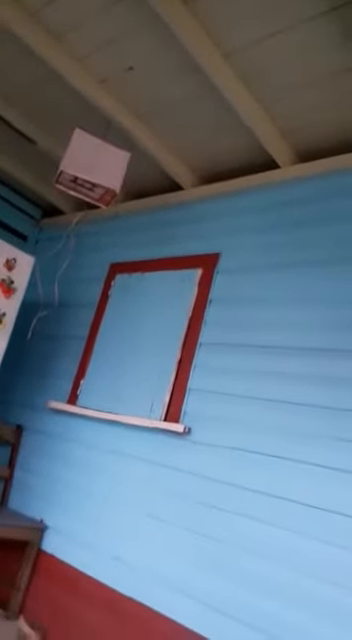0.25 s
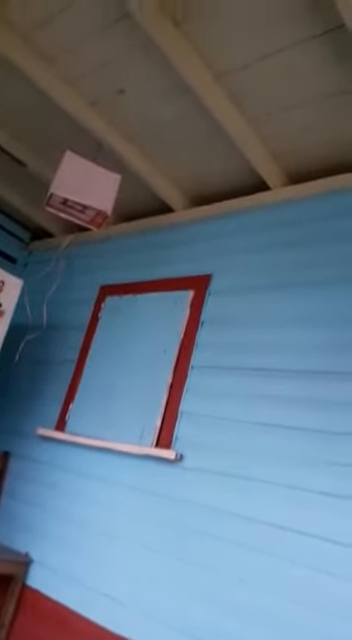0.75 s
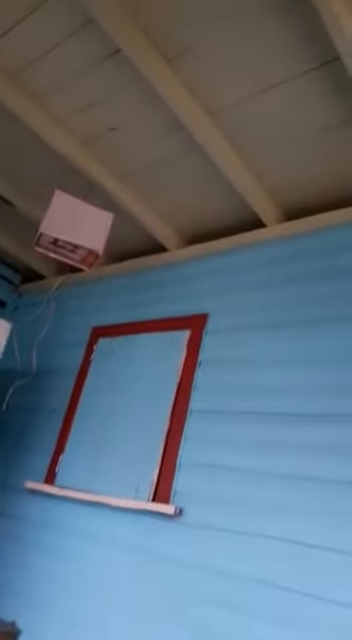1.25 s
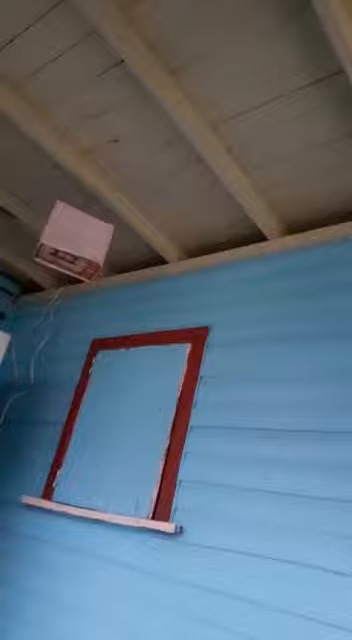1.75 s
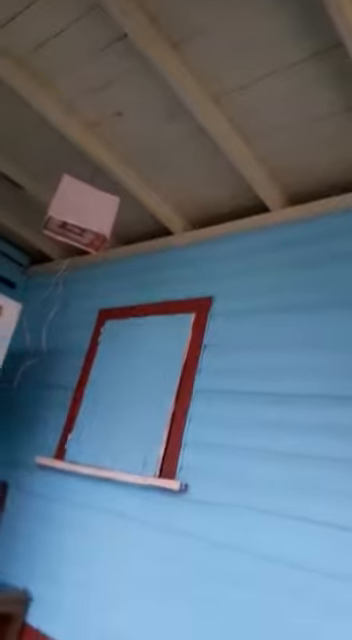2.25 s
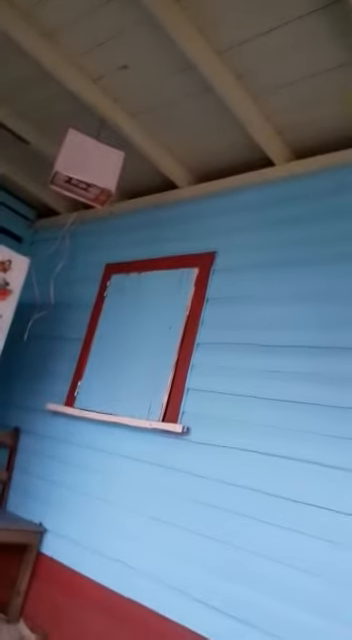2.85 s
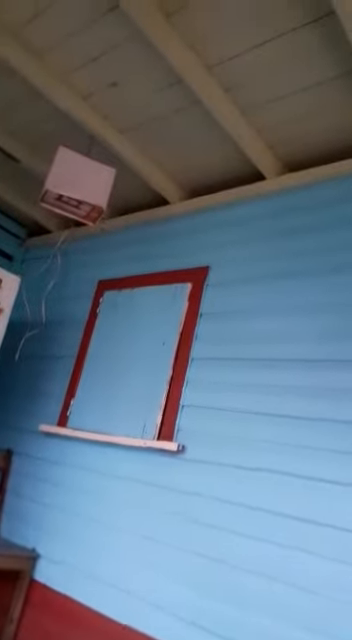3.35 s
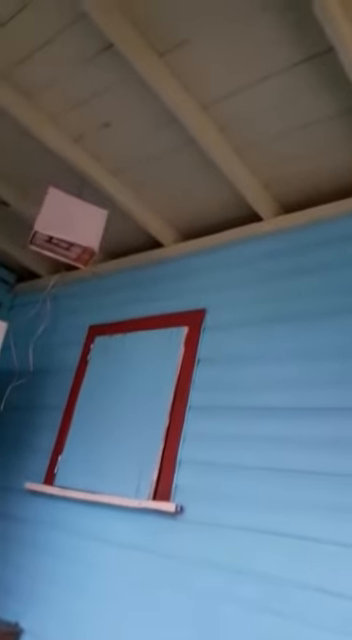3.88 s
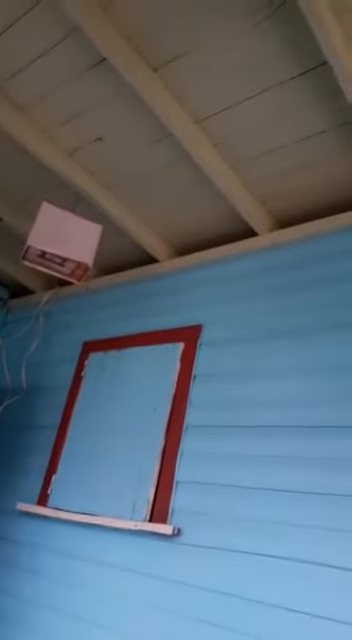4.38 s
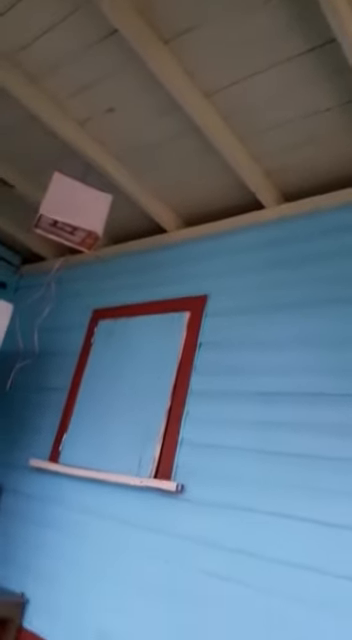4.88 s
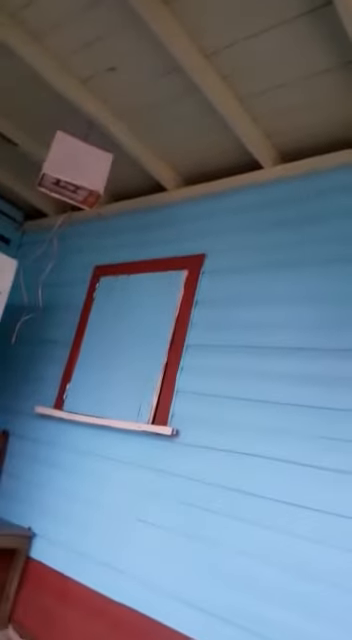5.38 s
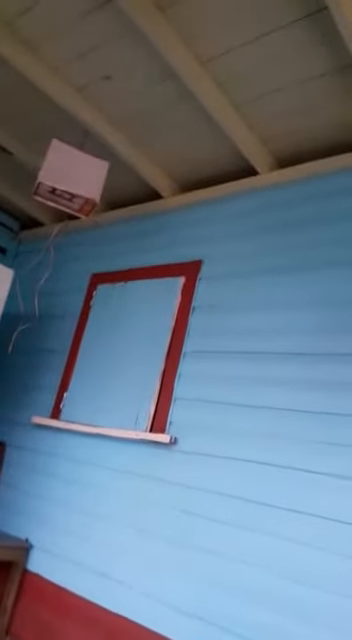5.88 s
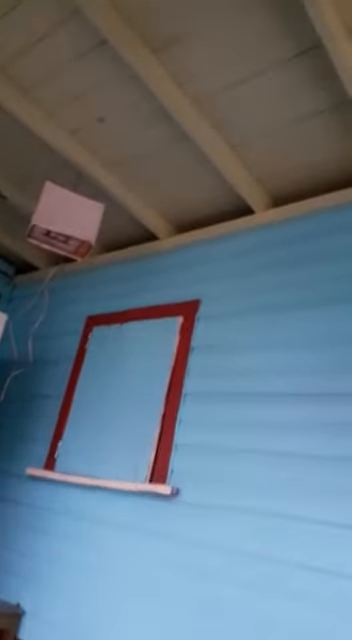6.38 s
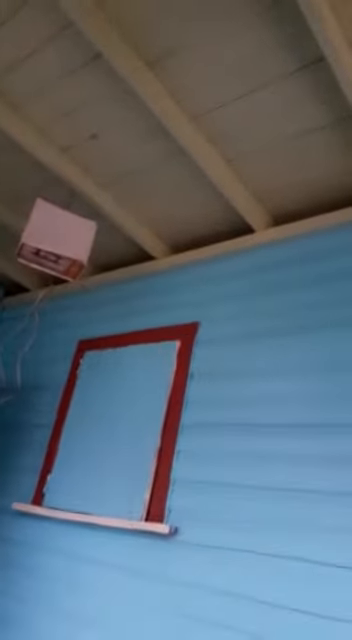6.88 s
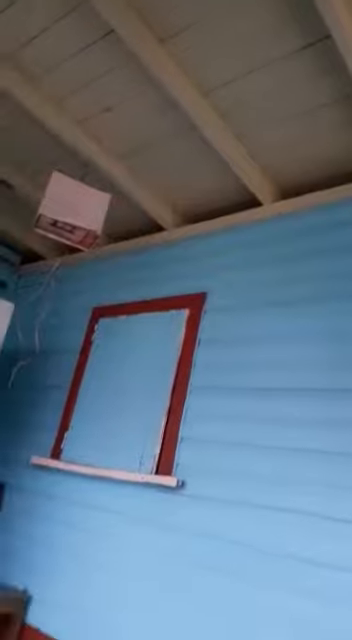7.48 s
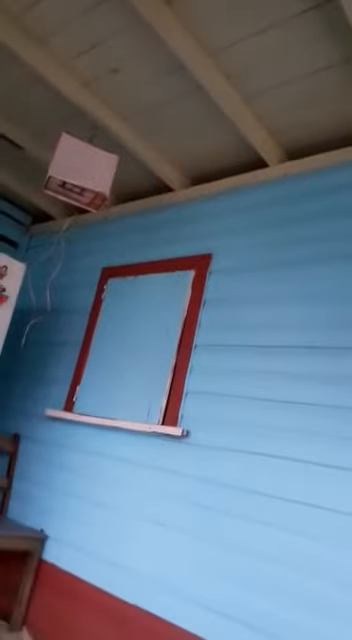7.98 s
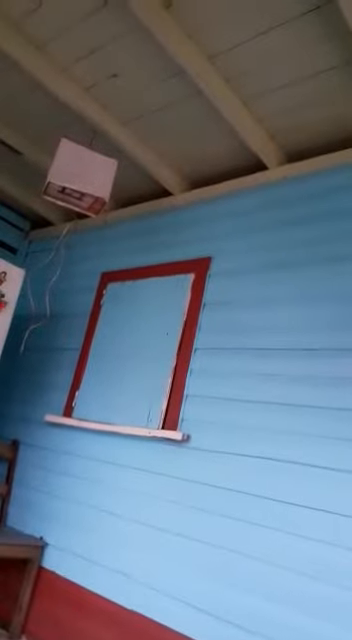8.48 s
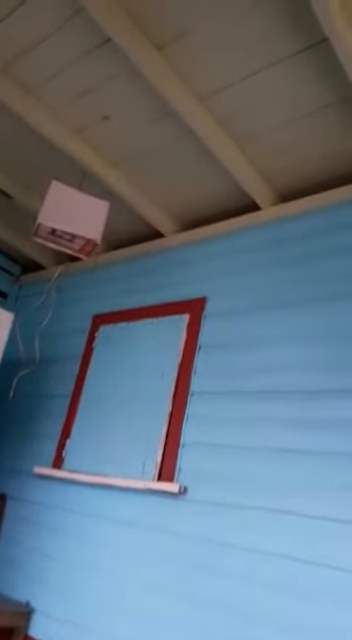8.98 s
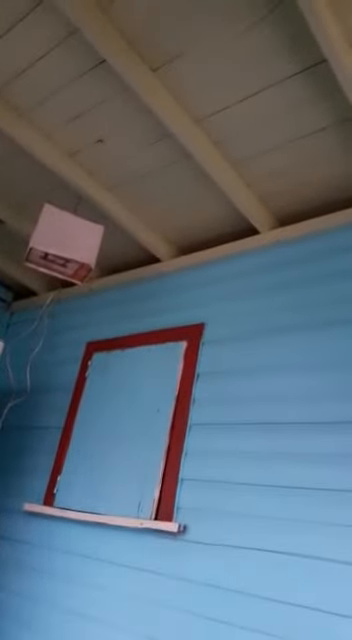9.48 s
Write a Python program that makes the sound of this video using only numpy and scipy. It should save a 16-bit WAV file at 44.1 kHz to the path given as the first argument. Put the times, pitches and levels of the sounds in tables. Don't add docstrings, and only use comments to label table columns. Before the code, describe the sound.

A songbird close by stays silent for seconds, then whistles rising slurs and a falling trill over faint hum, distant birds and soft wooden knocks.

```python
import sys
import numpy as np
from scipy import signal
from scipy.fft import rfft, irfft, next_fast_len
from scipy.io import wavfile
from scipy.ndimage import uniform_filter1d, minimum_filter1d

SR = 44100
rng = np.random.default_rng(int(sys.argv[2]) if len(sys.argv) > 2 else 0)


def digitize_waveform(pressure):
    field = np.atleast_2d(pressure).T
    bounded = np.clip(field, -1, 1)
    quanta = np.round(bounded * 32767).astype(np.int16)
    wavfile.write(sys.argv[1], SR, quanta)


def attenuation_scalar(level_db):
    decades = np.asarray(level_db, float) / 20
    return 10 ** decades


N = 429518
T = np.arange(N) / SR
SIZE = next_fast_len(N + SR)
BINS = np.arange(SIZE // 2 + 1) * SR / SIZE + 1e-3

# t/s, length/s, low f/Hz, top f/Hz, level/dB
SONG = [
    (6.777, 0.23, 3560, 4704, -54.5),
    (7.126, 0.26, 3456, 4543, -32.5),
    (7.527, 0.26, 3282, 4640, -22.5),
    (7.986, 0.24, 3010, 4515, -24),
    (8.357, 0.23, 2970, 3703, -28.5),
]
# share where attack ends, share where glide levels off, effort gained level/dB
MANNER = [(0.32, 0.61, -12.5), (0.34, .7, -8), (0.31, 0.77, 15), (0.37, .85, 2.5), (0.51, .74, -5)]
# t/s, f/Hz, level/dB
HOOK = [
    (8.665, 3730, -62),
    (8.725, 4317, -16.5),
    (8.789, 5130, -26),
    (8.815, 5290, -23),
    (8.831, 4430, -20),
    (8.86, 4518, -32),
]
# t/s, f/Hz, level/dB
SLUR = [
    (9.32, 3410, -46.5),
    (9.359, 3366, -39.5),
    (9.431, 2840, -38.5),
    (9.45, 2716, -42.5),
    (9.47, 2810, -66),
]
# t/s, starting f/Hz, knee f/Hz, level/dB
TRILL = [
    (9.005, 5750, 4260, -33.5),
    (9.079, 5540, 4270, -31),
    (9.159, 5420, 4060, -32),
    (9.245, 4720, 3940, -32.5),
]
OVERTONES_DB = [-33, -28, -40]
# f/Hz, level/dB
BEAK = [(6000, -7), (8500, -2), (10500, -14.5), (12000, -8), (13500, -3), (15500, 5)]
BRIGHT_DB = [-17, 5, 1.5, 0.5, 3, 0, 7]
# left echo t/ms, right echo t/ms, level/dB
BOARDS = [(2.5, 2.2, -3), (4.1, 5.1, -6), (11, 11.8, -7), (13.5, 14.6, -9)]

# t/s, length/s, first f/Hz, last f/Hz, level/dB
NEIGHBOUR = [
    (.3, 0.21, 6460, 5350, -54),
    (.92, .22, 6890, 5520, -53),
    (1.45, 0.36, 6965, 7305, -52),
    (2.07, .4, 7240, 8130, -56),
    (9.63, 0.14, 6770, 6420, -54),
]
# share of length, share of glide, level/dB
THIN = [(0, 0.27, -8.5), (0.301, 0.16, -0.5), (0.699, .88, -5.5), (.99, .99, -22.5)]
# t/s, f/Hz, level/dB
TUMBLE = [
    (4.69, 5160, -74),
    (4.72, 5010, -75),
    (4.75, 3650, -68.5),
    (4.79, 3500, -81),
]
# t/s, length/s, f/Hz, level/dB
PEEPS = [(.07, 0.119, 6090, -64), (.58, .05, 8560, -63.5), (.76, 0.25, 6810, -61.5), (1.17, .09, 9080, -68),
         (1.33, 0.18, 5840, -66), (1.85, 0.23, 9500, -66), (2.2, .07, 5790, -63), (7.78, 0.087, 6140, -59),
         (8.21, .17, 6080, -58), (8.42, .2, 5960, -61.5), (9.3, 0.06, 8750, -66.5), (9.48, 0.12, 6870, -64)]
# t/s, length/s, first f/Hz, level/dB
FAR_LOW = [(-.06, .12, 4295, -58.5), (.27, 0.18, 4240, -61), (.69, 0.18, 4276, -61.5),
           (1.1, 0.17, 4246, -62), (1.42, 0.18, 4260, -60.5), (1.83, 0.14, 4280, -59.5),
           (2.24, .19, 4175, -61.5), (2.81, .13, 5270, -66.5), (4.59, 0.076, 4100, -77),
           (5.06, 0.16, 4990, -68)]
# share of length, share of glide, level/dB
DROOP = [(0, 0.021, -3.5), (.34, .62, 0.5), (0.989, 1, -12.5)]
# t/s, length/s, first f/Hz, last f/Hz, level/dB
FAR_HIGH = [(-.03, .06, 5400, 4000, -62), (0, 0.05, 7900, 6820, -53), (.17, 0.048, 9740, 7040, -59.5),
            (.67, 0.05, 7900, 6250, -54.5), (1.6, 0.16, 9600, 9000, -67), (1.28, .15, 5150, 4920, -63.5),
            (1.7, 0.22, 5600, 4860, -66), (1.93, 0.061, 6630, 5060, -62), (2.15, 0.13, 5350, 4855, -65),
            (2.4, 0.064, 7820, 6065, -58), (7.1, 0.25, 7280, 6860, -63.5), (6.64, 0.13, 8500, 6180, -65.5),
            (7.42, .3, 10030, 6480, -55), (7.83, .29, 10280, 6330, -55), (8.22, 0.092, 8400, 6600, -52.5),
            (8.57, 0.21, 10220, 6900, -58), (9.03, 0.11, 6470, 5870, -47), (9.34, 0.12, 9900, 6350, -55)]
# share of length, share of glide, level/dB
SWOOP = [(0, 0.062, -16.5), (.6, .65, -2.5), (0.991, 1, 0.5)]

# wing f/Hz, width/Hz, strokes per s, level/dB
CRICKETS = [
    (6900, 500, 66, -69),
    (7400, 210, 45, -81.5),
    (5040, 370, 97, -68.5),
]
# middle of one chirp t/s, chirp length/s, period/s, last t/s
CHIRPS = [(4.84, .22, .393, 10), (5.02, .3, .393, 10), (5.14, .22, .921, 9)]

# t/s, peak level/dB, f/Hz, joist level/dB
KNOCKS = [(1.99, -40.5, 329.5, -8), (2.289, -43.5, 312, -10.5), (2.519, -47, 366, -2),
          (2.621, -38, 301.6, -7.5), (3.179, -42, 298.4, -15), (3.487, -45, 288, -22),
          (3.899, -44.5, 389.5, -4), (4.347, -43, 355, -16), (7.289, -45, 331, -9.5),
          (7.559, -48, 333, -3.5), (7.669, -49, 289, -2)]
# multiple of f, level/dB, t60/s
KNOCK_MODES = [(1.001, 6.5, 0.15), (1.65, 0, 0.14), (2.8, -3.5, 0.099), (4.1, -10, .07), (6.3, -9.5, .06)]
# t/s, length/s, centre f/Hz, level/dB
RUSTLES = [
    (2.57, 0.013, 1860, -62),
    (3.9, 0.029, 1850, -70),
    (4.08, 0.11, 1830, -66.5),
    (4.32, .08, 1895, -71),
    (7.27, 0.099, 1714, -74),
    (7.62, 0.19, 1780, -72),
]
# t/s, peak level/dB, left minus right level/dB
TICKS = [(2.2944, -60.5, -3), (2.5144, -66, 8), (2.8115, -68.5, -5), (3.216, -67.5, -12), (3.225, -64, 5),
         (3.3747, -65.5, 1), (3.487, -71, -5), (3.8132, -73, 7), (5.763, -73.5, -11.5)]

# f/Hz, level/dB per Hz
AIR = [(21, -52), (35, -22), (86, -14.5), (170, -12.5), (237, -3.5), (367, -8.5), (538, -19.5),
       (809, -18.5), (2550, -40.5), (3840, -38), (5210, -41), (7270, -38.5), (8690, -40.5), (10100, -45),
       (15600, -43.5)]
# t/s, level/dB
SWELL = [(0, 3), (1.4, 3.5), (3.0, 3), (4.1, 1.5), (5.75, 0.46), (7.5, 2), (8.3, 0.6), (9.4, 2.5),
         (9.74, -1)]
# f/Hz, share common to both
ALIKE = [(60, 0.71), (130, 1), (290, 0.87), (640, 0.65), (1410, 0.65), (3100, -0.16), (6820, -1.5),
         (15000, -0.72)]
# f/Hz, left minus right level/dB
PORTS = [(60, -6), (110, -8.5), (200, -2), (380, -3.5), (700, -2.5), (1290, -8.5), (2380, -10.5),
         (4400, -4.5), (8120, -5.5), (15000, 1.5)]


def unit(x):
    return x / np.sqrt(np.mean(x ** 2))


def over_hz(table, hz):
    f, value = np.array(table)[:, 0], np.array(table)[:, 1]
    return np.interp(np.log(hz), np.log(f), value)


def shape(x, gain):
    return irfft(rfft(x, SIZE) * gain, SIZE)[..., :N]


def peak(hz, width_hz):
    return 1 / (1 + 1j * (BINS ** 2 - hz ** 2) / (BINS * width_hz))


def walk(rate):
    k = int(SR / rate)
    steps = np.repeat(rng.standard_normal(N // k + 1), k)
    return 1.3 * uniform_filter1d(uniform_filter1d(steps, k), k)[:N]


def pan(db):
    return attenuation_scalar(np.array([[db / 2], [-db / 2]]))


def space(x, t60_s, wet_db, gap_s, rise_s, boards=()):
    t = np.arange(SR) / SR - gap_s
    fade = (t > 0) * (1 - np.exp(-np.abs(t) / rise_s)) * attenuation_scalar(-60 * t / t60_s)
    echo = rng.standard_normal((2, SR)) * fade
    echo = echo * attenuation_scalar(wet_db) / np.sqrt(np.sum(fade ** 2))
    echo[:, 0] = 1
    for left_ms, right_ms, db in boards:
        echo[[0, 1], [int(left_ms * SR / 1000), int(right_ms * SR / 1000)]] += attenuation_scalar(db)
    return shape(x, rfft(echo, SIZE))


def whistle(notes, overtones_db, edge_s, waver, waver_hz, bright_db=None):
    growth = 0.15
    out, drift = np.zeros(N), 1 + waver * walk(waver_hz)
    for note, open_db in zip(notes, bright_db or np.zeros(len(notes))):
        s, hz, db = np.transpose(note)
        span = slice(int(max(s[0] - edge_s, 0) * SR), int((s[-1] + edge_s) * SR))
        t = T[span]
        level_db = np.interp(t, s, db)
        pitch = uniform_filter1d(np.interp(t, s, hz), int(edge_s * SR * 2)) * drift[span]
        edge = np.clip(np.minimum(t - s[0], s[-1] - t) / edge_s + 1, 0, 1) ** 2
        phase = 2 * np.pi * np.cumsum(pitch) / SR
        tone = np.sin(phase)
        for k, part_db in enumerate(overtones_db, start=2):
            effort_db = growth * (level_db - db.max())
            part = attenuation_scalar(part_db + open_db + over_hz(BEAK, k * pitch) + effort_db)
            tone = tone + part * (k * pitch < SR / 2) * np.sin(k * phase)
        out[span] += np.sqrt(2) * uniform_filter1d(attenuation_scalar(level_db), int(edge_s * SR)) * edge * tone
    return out


def sung(rows, form):
    return [[(s + a * length, first + b * (last - first), db + c) for a, b, c in form]
            for s, length, first, last, db in rows]


def sagging(rows, fall):
    return [(s, length, hz, fall * hz, db) for s, length, hz, db in rows]


def rising_slurs():
    release, knee_glide = 0.9, 0.9
    start_db, attack_db, end_db = -42, -2.5, -26.5
    notes = []
    for (s, length, low, top, db), (attack, knee, lean_db) in zip(SONG, MANNER):
        share = np.array([0, attack, knee, release, 1])
        glide = np.interp(share, [0, knee, release], [0, knee_glide, 1])
        swell = np.array([start_db, attack_db, 0, 0, end_db]) + lean_db * (share - .6)
        notes.append(np.transpose([s + share * length, low + glide * (top - low), db + swell]))
    return notes


def trill_strokes():
    bend_s, knee_s, end_s, end_hz = .012, .022, .027, 2500
    return [[(s, top, db - 12), (s + bend_s, .7 * top + .3 * knee, db - 1.5),
             (s + knee_s, knee, db), (s + end_s, end_hz, db - 22.5)] for s, top, knee, db in TRILL]


def caged_bird():
    slurs = whistle(rising_slurs() + [HOOK, SLUR], OVERTONES_DB, 0.0037, 0.00039, 80, BRIGHT_DB)
    trill = whistle(trill_strokes(), [-36, -36, -40], 0.0013, .015, 500)
    porch = space(slurs + trill, .29, -4, .003, .002, boards=BOARDS)
    return pan(-0.95) * attenuation_scalar(-0.93) * porch


def neighbour_birds():
    thin = whistle(sung(NEIGHBOUR, THIN) + [TUMBLE], [-24], 0.018, 0.0044, 150)
    peep_form = [(0, 0.044, 0.014), (1, 0.98, -13.5)]
    peeps = whistle(sung(sagging(PEEPS, 0.95), peep_form), [], 0.0088, 0.014, 150)
    near = space(thin + peeps, 0.67, 4.6, 0.0022, 0.0036, boards=BOARDS)
    return pan(0.51) * attenuation_scalar(-2.0) * near


def far_birds():
    low = whistle(sung(sagging(FAR_LOW, .69), DROOP), [], 0.043, 0.062, 700)
    high = whistle(sung(FAR_HIGH, SWOOP), [], 0.012, 0.036, 600)
    low = space(low * attenuation_scalar(1.5), 0.7, 5.2, 0.0034, 0.014)
    high = space(high * attenuation_scalar(-4.5), 0.5, 3.9, .004, 0.012)
    return pan(-0.17) * low + pan(0.6) * high


def crickets():
    out = 0
    for (hz, width_hz, rate, db), (middle_s, length_s, period_s, last_s) in zip(CRICKETS, CHIRPS):
        place = (T - middle_s + length_s / 2) % period_s / length_s
        chirp = np.sin(np.pi * np.clip(place, 0, 1)) ** 0.31 * (T < last_s)
        chirp = chirp * attenuation_scalar(.8 * walk(1 / period_s))
        stroke = np.exp(-((rate * T + 0.063 * walk(36)) % 1) / 1.1)
        scrape = stroke * rng.standard_normal((2, N))
        out = out + attenuation_scalar(db) * chirp * unit(shape(scrape, peak(hz, width_hz) ** 2))
    return out


def knocks():
    out, t = np.zeros(N + SR), T[:SR // 2]
    detune = 1 + .06 * rng.standard_normal((len(KNOCKS), len(KNOCK_MODES)))
    joists = np.sin(2 * np.pi * 68 * t) + 1.5 * np.sin(2 * np.pi * 112 * t)
    joists = joists * attenuation_scalar(-60 * t / .3) * (1 - np.exp(-t / 0.0065))
    for (s, db, hz, deep_db), off in zip(KNOCKS, detune):
        ring = 0
        for (k, mode_db, t60), o in zip(KNOCK_MODES, off):
            ring = ring + attenuation_scalar(mode_db - 60 * t / t60) * np.sin(2 * np.pi * k * hz * o * t)
        blow = ring * (1 - np.exp(-t / 0.0024)) + attenuation_scalar(deep_db) * joists
        out[int(s * SR):int(s * SR) + len(t)] += attenuation_scalar(db - 7.5) * blow
    return space(out[:N], .25, -3, .005, .008)


def rustles():
    form = [(0, 0.15, 2), (1, 1, -4.5)]
    drag = whistle(sung(sagging(RUSTLES, 0.93), form), [], .015, 0.1, 900)
    return space(drag * attenuation_scalar(-2.5), 0.44, 1.5, .003, .005)


def ticks():
    out, t = np.zeros((2, N)), T[:SR // 20]
    chance = rng.standard_normal((len(TICKS), len(t)))
    fade = np.exp(-t / 0.0016) + 0.22 * np.exp(-t / 0.066)
    for (s, db, pan_db), grit in zip(TICKS, chance):
        out[:, int(s * SR):int(s * SR) + len(t)] += pan(pan_db + 2.0) * attenuation_scalar(db + 10.5) * grit * fade
    return shape(out, peak(6700, 9000))


def swell_db():
    swell = np.interp(T, *np.transpose(SWELL))
    return swell, swell + 1.5


def air():
    swell, bass_db = swell_db()
    treble_db = 1.51 * swell + 3.5
    common = np.clip(over_hz(ALIKE, BINS), 0, 1)
    mid, side = rfft(rng.standard_normal((2, SIZE)))
    ports = np.sqrt(1 + common) * mid + np.sqrt(1 - common) * side * np.array([[1], [-1]])
    ports = ports * attenuation_scalar(over_hz(AIR, BINS))
    scale = attenuation_scalar(-57.5) / np.sqrt(2 * np.sum(np.abs(ports[0]) ** 2)) * SIZE
    out = 0
    for hz in 25 * 2. ** np.arange(10):
        band = np.clip(1 - np.abs(np.log2(BINS / hz)), 0, 1)
        band = np.where((hz > 1e4) & (BINS > hz), 1, band)
        high = np.clip(np.log2(hz / 800) / 1.75, 0, 1)
        db = (1 - high) * bass_db + high * treble_db + 0.95 * walk(6)
        out = out + scale * attenuation_scalar(db) * irfft(ports * band, SIZE)[:, :N]
    return out


def drone():
    hz, width_hz = 242, 5.0
    _, bass_db = swell_db()
    rumble = unit(shape(rng.standard_normal(N), peak(hz, width_hz) ** 2))
    hum = 2.6 * np.sin(2 * np.pi * hz * T + walk(2.045))
    return attenuation_scalar(-65.5 + .5 * bass_db) * (rumble + hum)


def masked(x):
    mask_db, up_hz, down_hz = -35, 1600, 500
    hz, _, z = signal.stft(x, SR, nperseg=1024)
    power = uniform_filter1d(np.abs(z) ** 2, size=7, axis=1)
    up, down = int(up_hz / hz[1]), int(down_hz / hz[1])
    loudest = -minimum_filter1d(-power, size=up + down + 1, axis=1, origin=(up - down) // 2)
    keep = (power > loudest * attenuation_scalar(2 * mask_db)) | (hz[:, None] < 2000)
    return signal.istft(z * keep, SR, nperseg=1024)[1][:, :N]


def scene():
    lag = np.exp(-2j * np.pi * BINS * np.array([[0], [0.00013]]))
    birds = caged_bird() + neighbour_birds() + far_birds()
    house = shape(knocks() + air() + drone(), lag)
    return birds + crickets() + rustles() + ticks() + house


def low_pass(x):
    return signal.sosfilt(signal.butter(12, 15780, fs=SR, output="sos"), x)


def record(dry):
    bent = dry + 0.038 * dry ** 2
    tilt_db = over_hz(PORTS, BINS) / 2
    passband = 1 / (1 + (38 / BINS) ** 4) * (BINS < 15760)
    ports = shape(bent, passband * attenuation_scalar(np.array([tilt_db, -tilt_db])))
    return low_pass(masked(ports))


dry = scene()
out = record(dry)
digitize_waveform(out)
```